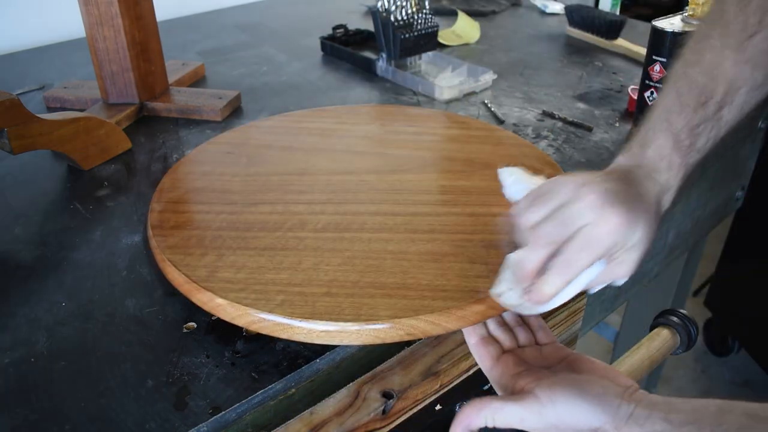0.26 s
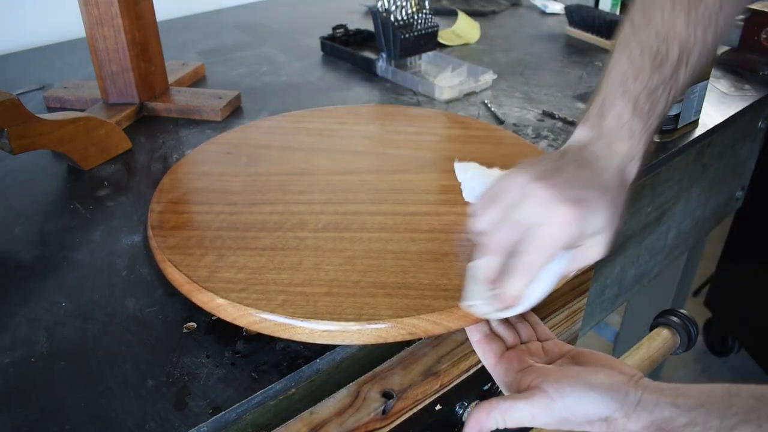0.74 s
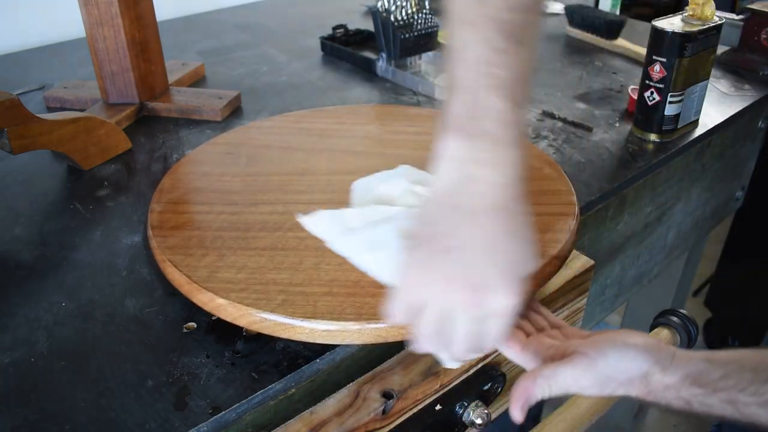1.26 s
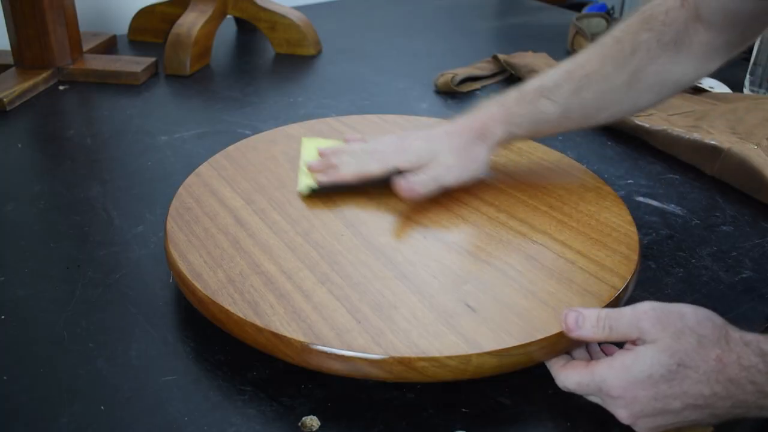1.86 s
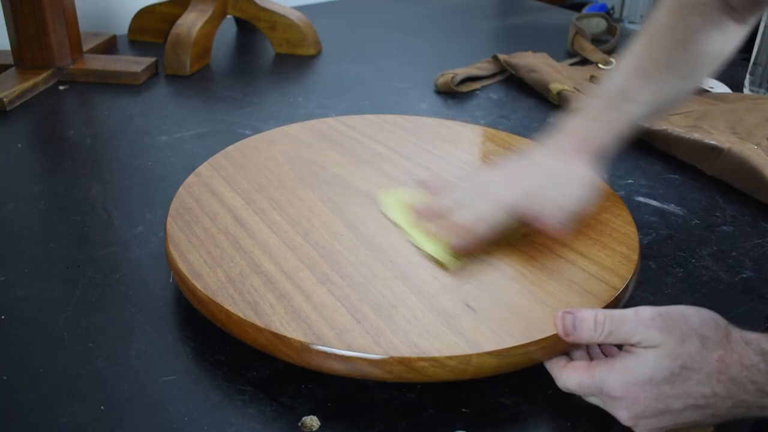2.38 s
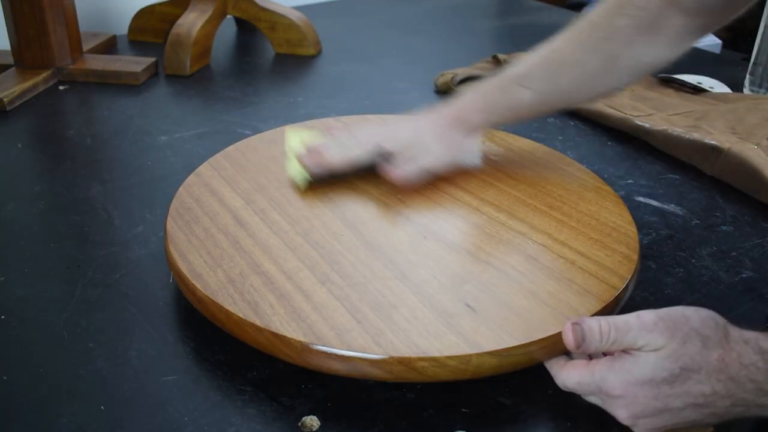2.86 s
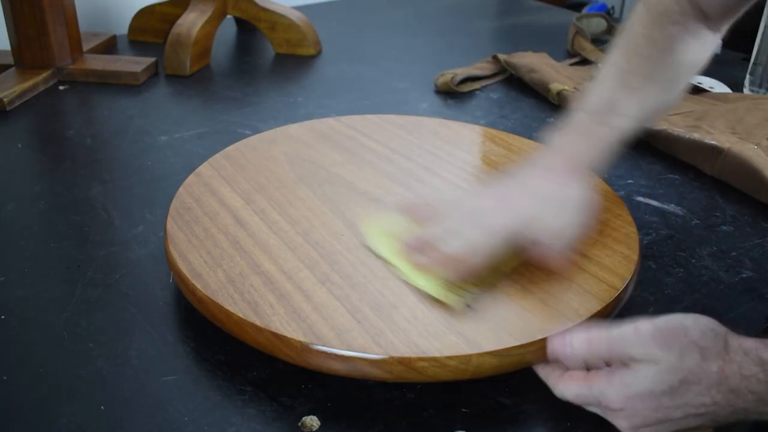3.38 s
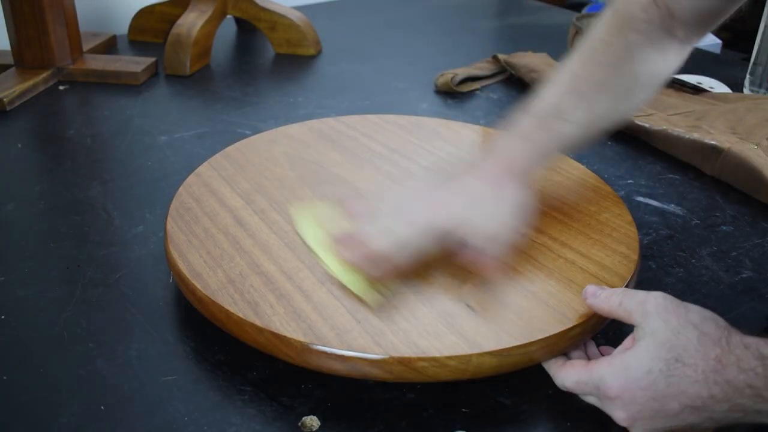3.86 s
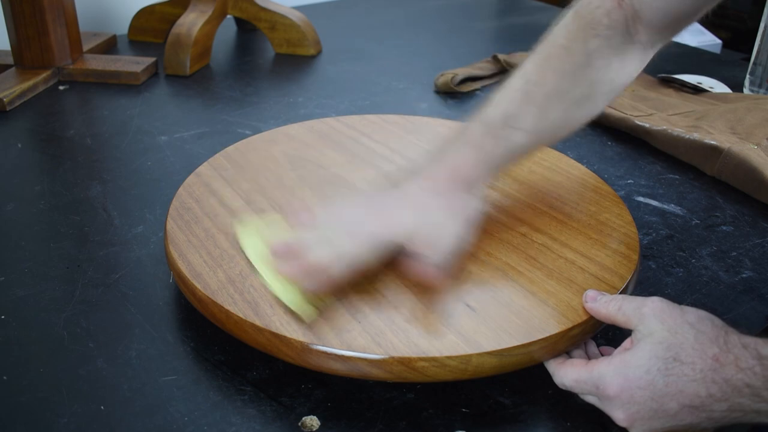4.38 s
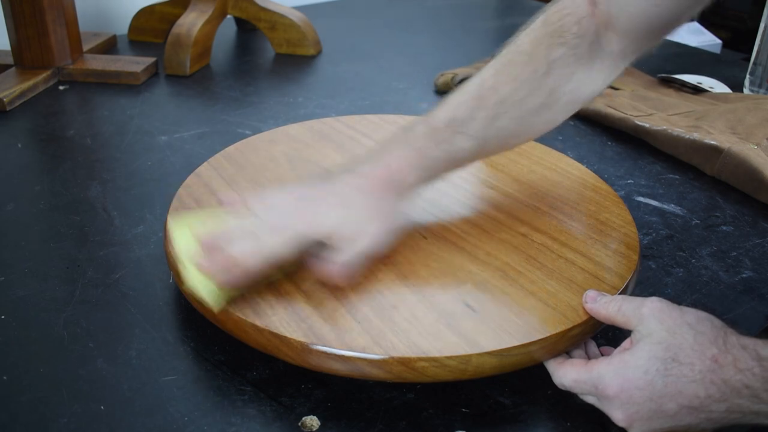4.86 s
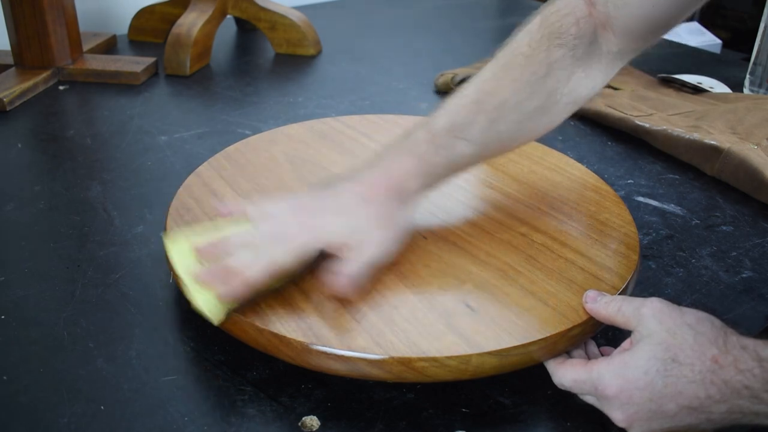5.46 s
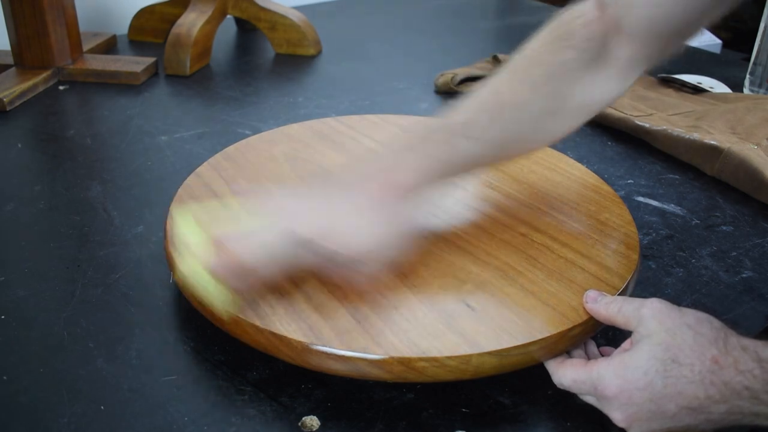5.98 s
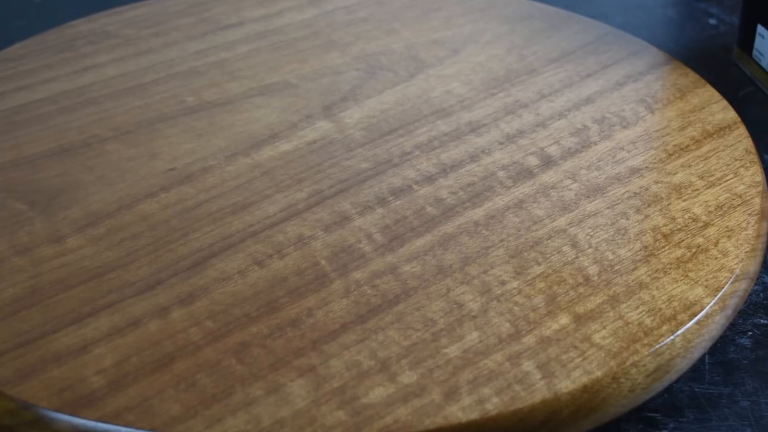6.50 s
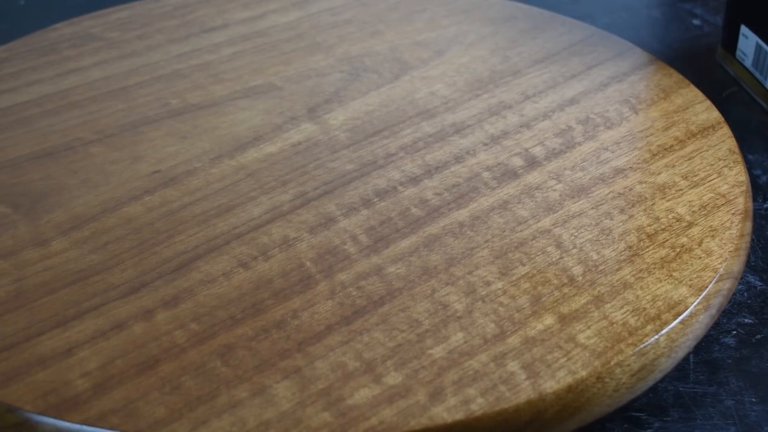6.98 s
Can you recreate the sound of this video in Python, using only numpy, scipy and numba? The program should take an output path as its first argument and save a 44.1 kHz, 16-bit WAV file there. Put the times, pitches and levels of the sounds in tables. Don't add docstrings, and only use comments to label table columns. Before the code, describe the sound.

Close, fairly dry workshop sound: soft fibrous wiping with a light wooden ring and wavering turntable rumble, ending in a small low knock. Then bright, grainy scrubbing takes over, long strokes at first, later short and quick, with grit snapping and a very faint distant machine hum. The scrubbing stops dead, leaving low, even room and microphone hiss.

```python
import sys
import numpy as np
from scipy import signal
from scipy.fft import rfft, irfft
from scipy.io import wavfile
from scipy.ndimage import uniform_filter1d
from numba import njit

SR = 44100
rng = np.random.default_rng(int(sys.argv[2]) if len(sys.argv) > 2 else 0)


def unload_wav(signal):
    wavfile.write(
        sys.argv[1],
        SR,
        np.round(np.clip(np.atleast_2d(signal).T, -1, 1) * 32767).astype(np.int16),
    )


def decibels_to_gain(level_db):
    exponent = np.asarray(level_db, float) / 20
    return 10 ** exponent


N = 319015

CHANGES_S = (1.3551, 6.4752)
# (frequency [Hz], level per Hz [dB])
PAD_TONE = [(470, -44.5), (800, -36), (895, -28.5), (1060, -33), (1490, -18), (1710, -15), (3140, -8),
            (3380, -6.5), (5280, -1.5), (6940, 1.5), (9010, -2), (13100, -14), (15600, -26)]


def level(x, db=0):
    return x * decibels_to_gain(db) / np.sqrt(np.mean(x ** 2))


def curve(table, col):
    rows = np.array(table, float)
    return np.interp(np.arange(N) / SR, rows[:, 0], rows[:, col])


def colour(x, points):
    hz, db = np.transpose(points)
    grid = np.maximum(np.fft.rfftfreq(8192, 1 / SR), 1)
    log_gain = np.interp(np.log(grid), np.log(hz), db) * np.log(10) / 20
    cep = irfft(log_gain)
    cep[1:4096] *= 2
    cep[4097:] = 0
    response = irfft(np.exp(rfft(cep)))[:4096]
    return signal.fftconvolve(x, response)[:N]


def below(x, hz):
    grid = np.maximum(np.fft.rfftfreq(N, 1 / SR), 1)
    return irfft(rfft(x) / (1 + (grid / hz) ** 8), N)


@njit
def svf(x, hz, width):
    y, b, l = np.empty(len(x)), 0., 0.
    for i in range(len(x)):
        g, k = np.tan(np.pi * hz[i] / SR), width / hz[i]
        v = (b + g * (x[i] - l)) / (1 + g * (g + k))
        b, l, y[i] = 2 * v - b, l + 2 * g * v, k * v
    return y


def ring(x, hz, width_hz):
    return svf(x, np.full(N, 1. * hz), 1. * width_hz)


def walk(rate):
    k = int(SR / rate)
    held = np.repeat(rng.standard_normal(4000), k)[:N]
    return 0.905 * uniform_filter1d(uniform_filter1d(held, k), k)


def warble(hz, jitter, jitter_rate, flutter_db, flutter_rate):
    phase = 2 * np.pi * np.cumsum(hz * (1 + jitter * walk(jitter_rate))) / SR
    return level(np.sin(phase) * decibels_to_gain(flutter_db * walk(flutter_rate)))


def friction(scatter_db, patchy_db, patch_rate):
    luck = np.minimum(rng.exponential(size=N), 5)
    size = decibels_to_gain(scatter_db * luck + patchy_db * walk(patch_rate))
    return level(size * rng.standard_normal(N))


def strokes(turns_s, place, square):
    t = np.arange(N) / SR
    k = np.clip(np.searchsorted(turns_s, t) - 1, 0, len(place) - 1)
    along = np.clip((t - turns_s[k]) / np.diff(turns_s)[k], 0, 1)
    top = np.clip(place[k], 1 / 50, 49 / 50)
    rising = along < top
    from_top = np.where(rising, 1 - along / top, (along - top) / (1 - top))
    return k, along, rising, 1 - from_top ** square[k]


def knocks(table, rise_s):
    out, t = np.zeros(N), np.arange(8192) / SR
    noises = rng.standard_normal((len(table), 8192))
    for (s, db, hz, t60), noise in zip(table, noises):
        smooth = uniform_filter1d(uniform_filter1d(noise, size=150), size=150)
        smear = 0.5 + 1.1 * level(smooth)
        shape = (1 - np.exp(-t / rise_s)) * decibels_to_gain(db - 60 * t / t60) * smear
        start = int(s * SR)
        out[start:][:8192] += (shape * np.sin(2 * np.pi * hz * t))[:N - start]
    return out


def whirr(balls):
    # (loudest time [s], length [s], first pitch [Hz], last pitch [Hz], level [dB])
    swings = [
        (.095, .3, 650, 800, -38),
        (.235, .08, 860, 890, -44),
        (.29, .2, 1190, 1290, -41.5),
        (.53, .2, 900, 890, -51),
        (.85, .22, 1200, 1250, -52),
        (.99, .3, 680, 430, -44),
    ]
    rise, glide, edge_db = .4, .3, -21
    t, pitch, loud = np.arange(N) / SR, 0, 1e-5
    for s, length, first_hz, last_hz, db in swings:
        along = (t - s) / length + rise
        away = np.where(t < s, 1 - along / rise, (along - rise) / (1 - rise))
        size = decibels_to_gain(db + edge_db * away)
        hz_now = last_hz + (first_hz - last_hz) * np.exp(-np.maximum(along, 0) / glide)
        pitch = pitch + size * hz_now
        loud = loud + size
    hz = np.maximum(pitch / loud, 100)
    noise = level(svf(svf(balls, hz, 220.), hz, 220.), -4)
    squeal = decibels_to_gain(-2) * warble(hz, .075, 110, 1.8, 50)
    return (squeal + noise) * loud


def bearing():
    # (time [s], level [dB])
    roll_curve = [(0, -41), (.09, -37), (.2, -42.5), (.42, -44), (.54, -42.5), (.68, -44), (.87, -46),
                  (.98, -40), (1.355, -43.5)]
    # (start [s], end [s], level [dB])
    songs = [
        (.23, .39, -49),
        (.43, .54, -55),
        (.6, .74, -52),
        (.79, .92, -52),
        (1.0, 1.31, -46.5),
    ]
    # (time [s], peak [dB], pitch [Hz], time to fall 60 dB [s])
    settle = [
        (1.285, -37, 340, .09),
        (1.29, -41, 480, .07),
    ]
    t = np.arange(N) / SR
    balls = friction(scatter_db=1.2, patchy_db=1.1, patch_rate=30)
    roll = level(ring(rng.standard_normal(N), 720, 740), -4) * decibels_to_gain(curve(roll_curve, 1))
    song_loud = decibels_to_gain(-81)
    fade_s = 0.071
    for start, end, db in songs:
        song_loud = song_loud + decibels_to_gain(db) * np.clip(np.minimum(t - start, end - t) / fade_s, 0, 1)
    sing = warble(np.full(N, 2128), .005, 60, 3.5, 35) * song_loud
    return roll + whirr(balls) + sing + knocks(settle, rise_s=0.0094)


def board_mode(slip, hz, width_hz, db):
    centre = hz * (1 + .016 * walk(9))
    width = 1.5 * width_hz
    return decibels_to_gain(db + 4 * walk(14)) * svf(svf(slip, centre, width), centre, width)


def rag():
    # (turn [s], top swish [dB], place of top speed [0-1], squareness [1], board ring [dB])
    wipes = [
        (.02, -40.5, .35, 2.4, -45.5),
        (.176, -39.5, 0.47, 2, -39),
        (.418, -40, 0.49, 1.8, -42),
        (0.577, -38.5, 0.44, 1.56, -39),
        (.78, -40, 0.52, 1.3, -38),
        (0.944, -39, 0.11, 0.84, -36.5),
        (1.322, -51, 0.85, 0.99, -44.5),
    ]
    # (frequency [Hz], level per Hz [dB])
    cloth_tone = [(710, -26), (1200, -6), (1990, -6.5), (2100, -4), (2740, -5), (3020, -5.5), (3290, -4.5),
                  (4210, -3.5), (7110, 0.5), (15600, -28.5)]
    # (frequency [Hz], width [Hz], level [dB])
    board_modes = [(2680, 70, -2), (2830, 90, 0), (3250, 110, 1), (3850, 80, 0), (4480, 100, -5),
                   (5160, 110, -5), (6920, 120, -7)]
    end_s, swish_turn_db, ring_turn_db = 1.36, -61, -52.5
    turn_s, swish_db, place, square, ring_db = np.transpose(wipes)
    k, _, _, speed = strokes(np.append(turn_s, end_s), place, square)
    swish = decibels_to_gain(swish_turn_db) + (decibels_to_gain(swish_db[k]) - decibels_to_gain(swish_turn_db)) * speed
    stir = decibels_to_gain(ring_turn_db) + (decibels_to_gain(ring_db[k]) - decibels_to_gain(ring_turn_db)) * speed
    slip = friction(scatter_db=1.2, patchy_db=1.5, patch_rate=49)
    cloth = colour(slip, cloth_tone)
    dull = below(cloth, 4000)
    modes = sum(board_mode(slip, *mode) for mode in board_modes)
    board = level(dull, -1.2) + level(modes, -6.8)
    return level(cloth - dull, 0.47) * swish + board * stir


def shop(points, db):
    return level(colour(rng.standard_normal(N), points), db) * decibels_to_gain(.3 * walk(4.8))


def hand():
    # (turn [s], speed at turn [dB], top speed [dB], place of top speed [0-1], squareness [1])
    scrubs = [(1.35, -45, -44, .1, 1.1), (1.401, -59, -36, 0.59, 3.1), (1.892, -52, -33, 0.27, 2.1),
              (2.297, -48, -34.5, 0.61, 3.8), (2.789, -50, -31.5, 0.33, 1.4), (3.344, -54, -32.5, 0.65, 2),
              (3.74, -45, -29, 0.53, 1.5), (4.061, -42, -23.5, 0.67, 0.54), (4.316, -38, -26.5, 0.38, 1.36),
              (4.54, -37, -25, 0.81, 0.91), (4.723, -36, -27.5, 0.31, 1.1), (4.891, -40, -31.5, 0.62, 1.5),
              (5.033, -42, -30, 0.43, 1.4), (5.184, -46, -30.5, 0.62, 1.8), (5.342, -43, -29.5, 0.36, 2.05),
              (5.505, -44.5, -31, .75, 1.5), (5.659, -42.5, -28.5, 0.42, 1.54),
              (5.825, -44, -30.5, 0.7, 2.1), (5.98, -38.5, -29, .55, 5.4), (6.196, -38.5, -29.5, 0.9, 5),
              (6.421, -33.5, -24.5, 0.55, 0.74)]
    # (time [s], pressure [dB])
    press = [(1.36, 5), (1.6, -4.5), (1.9, 4), (2.1, -1), (2.45, -2.5), (2.75, 7.5), (2.95, 5), (3.25, .5),
             (3.55, -3), (3.8, 2), (4.2, -2), (4.45, 0), (4.7, -3), (5.2, -1.5), (5.6, -1.3), (5.85, -3),
             (6.15, -0.5), (6.47, 0.6)]
    # (time [s], extra pressure [dB])
    digs = [(1.575, 7.7), (1.8, 4.4), (2.21, 4.8), (2.6, 5.1), (2.76, 1.8), (3.19, 2.1), (2.87, 2.5),
            (3.68, 3.2), (4.08, 2.3), (4.38, 2.8), (4.76, 3.3), (5.33, 2.4), (5.64, 4.7), (5.84, 3.9),
            (5.99, 4.3), (6.18, 3.6)]
    # (level at usual speed [dB], per speed [dB/dB], per pressure [dB/dB],
    # loss at a turn [dB], gain over a stroke as the hand leans in [dB])
    board_share = (-10.5, 0.07, 0.48, -3, 1)
    air_share = (-15, -0.07, 0, 11, 1.5)
    body_share = (-21.5, -0.3352, 1.27, -4.5, 0.5)
    end_s, usual_speed_db, dig_s = 6.53, -38, 0.039
    turn_s, turn_db, top_db, place, square = np.transpose(scrubs)
    turns_s = np.append(turn_s, end_s)
    k, along, rising, shape = strokes(turns_s, place, square)
    nearest_turn = np.where(rising, k, k + 1)
    slowest = decibels_to_gain(np.append(turn_db, turn_db[-1])[nearest_turn])
    speed = slowest + (decibels_to_gain(top_db[k]) - slowest) * shape
    t = np.arange(N) / SR
    dig_db = sum(db * np.exp(-((t - s) / dig_s) ** 2) for s, db in digs)
    press_db = curve(press, 1) + dig_db
    faster_db = 20 * np.log10(speed) - usual_speed_db
    lean = uniform_filter1d(along - .5, size=SR // 40)
    shares = []
    for db, per_speed, per_press, lost, gained in (board_share, air_share, body_share):
        share = db + per_speed * faster_db + per_press * press_db
        shares.append(share - lost * (1 - shape) ** 1.9 + gained * lean)
    brisk = uniform_filter1d(np.log2(.5 / np.diff(turns_s)[k]), size=SR // 2)
    thrum_db = -13.5 + 6 * brisk + 0.41 * press_db
    return speed, shares, thrum_db


def pad():
    # (frequency [Hz], width [Hz], level [dB])
    body_modes = [(929, 39, -19), (1517, 61, -5), (1220, 40, -28)]
    # (time [s], frequency [Hz])
    sheen = [(1.36, 7000), (1.49, 7650), (1.84, 6900), (2.46, 7500), (2.75, 6780), (2.88, 7640),
             (3.47, 7000), (3.65, 6600), (4.01, 7400), (4.25, 6600), (4.43, 7200), (4.88, 6170),
             (6.47, 7100)]
    body_edge_hz = 1330
    speed, (board_db, air_db, body_db), thrum_db = hand()
    slip = friction(scatter_db=2.13, patchy_db=1.35, patch_rate=110)
    sound = colour(slip, PAD_TONE)
    lowest, low, most = below(sound, 2230), below(sound, 4190), below(sound, 9220)
    heard = lowest - below(lowest, body_edge_hz)
    body = level(heard - below(heard, body_edge_hz), -1.4)
    for hz, width_hz, db in body_modes:
        body = body + level(ring(ring(slip, hz, width_hz), hz, width_hz), db)
    body = body + level(below(lowest, body_edge_hz)) * decibels_to_gain(thrum_db)
    scrub = level(most - low, -0.35) + level(svf(slip, curve(sheen, 1), 2200.0), -7.5)
    board = level(low - lowest, 0.22) * decibels_to_gain(board_db + 1.7 * walk(45))
    air = level(sound - most, 0.52) * decibels_to_gain(air_db + 0.58 * walk(30))
    rub = body * decibels_to_gain(body_db) + board + level(scrub, 0.063) + air
    return rub * speed


def hums():
    # (start [s], end [s], pitch [Hz], level [dB])
    tones = [
        (1.55, 1.9, 258, -70),
        (4.5, 4.73, 1200, -62),
        (1.36, 6.47, 118, -81),
        (4.3, 4.42, 115, -72),
    ]
    t, out = np.arange(N) / SR, 0
    for start, end, hz, db in tones:
        on = np.clip(np.minimum(t - start, end - t) / 0.026, 0, 1)
        out = out + on * decibels_to_gain(db) * warble(np.full(N, hz), .012, 20, 4, 12)
    return out


def room(x, t60, wet_db):
    t = np.arange(int(.3 * SR)) / SR
    tail = rng.standard_normal(len(t)) * decibels_to_gain(-60 * t / t60) * (t > .002)
    return x + decibels_to_gain(wet_db) * signal.fftconvolve(x, tail / np.linalg.norm(tail))[:N]


def grit(table, trim_db):
    out, t = np.zeros(N), np.arange(2048) / SR
    noises = rng.standard_normal((len(table), 2048))
    for (s, db, hz, ring_db, fade_s), noise in zip(table, noises):
        burst = (noise + 2 * (t == 0)) * np.exp(-t / fade_s)
        scratch = colour(burst, PAD_TONE + [(16000, -52)])[:2048]
        scratch = uniform_filter1d(scratch, size=3)
        centre = np.full(2048, 1. * hz)
        patch = svf(svf(burst, centre, 1200.), centre, 1200.)
        both = scratch / abs(scratch).max() + decibels_to_gain(ring_db) * patch / abs(patch).max()
        out[int(s * SR):][:2048] += decibels_to_gain(db + trim_db) * both
    out = out - below(out, 1700)
    return room(out, t60=0.052, wet_db=-4.5)


def catches():
    # (time [s], peak [dB], ring pitch [Hz], ring share [dB], fade [s])
    ticks = [
        (1.5599, -18, 3300, -9, .008),
        (1.9684, -17, 3420, -8, .003),
        (1.9935, -14, 3820, -14, .003),
        (2.0468, -11.5, 4160, -14, .002),
        (2.1784, -15, 3800, -18, .001),
        (2.6076, -13, 2200, -4, .003),
        (3.4167, -23, 2900, -4, .004),
        (3.4662, -19, 3880, -2, .004),
        (3.6576, -15.5, 3900, -4, .004),
    ]
    snags = [(1.779, -23, 2400, -5, 0.0048), (2.0682, -27, 3500, -10, 0.0034),
             (2.4394, -28, 4440, -8, 0.0036), (2.6566, -14.5, 4500, -14, 0.004),
             (3.0985, -25, 4430, 3, 0.004), (3.3767, -33, 4310, -8, 0.012),
             (3.6046, -16.5, 4240, -4, 0.0045), (4.1062, -15, 4410, -7, 0.0019),
             (4.153, -15, 3830, -1.5, 0.003), (4.1911, -15, 3900, -5, 0.0032),
             (4.3723, -12, 4035, -18, 0.0051), (4.8284, -15, 4400, -5, 0.0088),
             (5.5713, -17, 4430, -10, 0.0067), (5.949, -11.5, 4360, -21, 0.0074),
             (6.3824, -12, 3310, -14, 0.0049), (6.397, -14, 3700, -6, 0.0032)]
    # (time [s], peak [dB], pitch [Hz], time to fall 60 dB [s])
    rocks = [
        (2.72, -55, 620, .12),
        (5.64, -43, 1270, .15),
        (6.397, -39, 1200, .04),
    ]
    sharp = grit(ticks, trim_db=-.6)
    return sharp + grit(snags, trim_db=-3.5) + knocks(rocks, rise_s=0.002)


def scene():
    # (frequency [Hz], level per Hz [dB])
    rag_air = [(15, -43), (25, -18.5), (54, -22), (261, -5), (338, -8), (730, -3), (882, 0), (1500, -8.5),
               (1950, -19.5), (3300, -120)]
    pad_air = [(15, -62), (25, -25), (379, -11), (1270, -7.5), (1500, -14), (1620, -28), (2780, -5),
               (6750, -4.5), (8380, -12.5), (12500, -26), (15600, -28)]
    empty_air = [(24, -44), (40, -48), (64, -17), (150, -9.5), (183, -9.5), (294, -2.5), (861, -6),
                 (1350, -8), (1490, -8), (1910, -8), (2390, -10), (5190, -17), (15600, -31)]
    part = np.searchsorted(CHANGES_S, np.arange(N) / SR)
    first = rag() + bearing() + shop(rag_air, -49)
    second = pad() + catches() + hums() + shop(pad_air, -51)
    third = shop(empty_air, -47.5)
    return np.choose(part, [first, second, third])[None]


def band_limit(x):
    return signal.sosfilt(signal.butter(12, 15710, fs=SR, output="sos"), x)


def record(dry):
    offset = (-.0118, -.01125)
    t = np.arange(N) / SR
    off = np.interp(t, (CHANGES_S[1], N / SR), offset) * (t > CHANGES_S[1])
    return band_limit(dry + off)


dry = scene()
out = record(dry)
unload_wav(out)
```